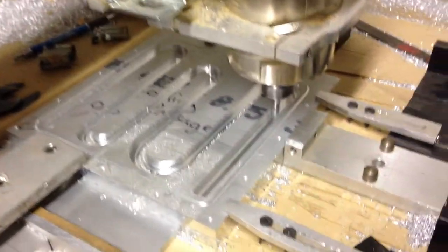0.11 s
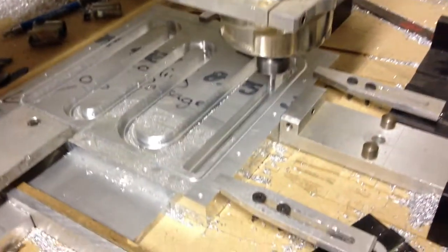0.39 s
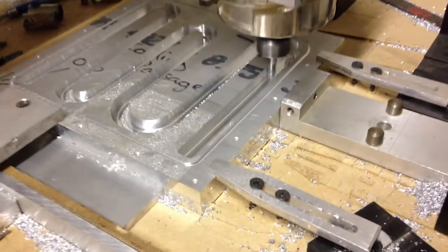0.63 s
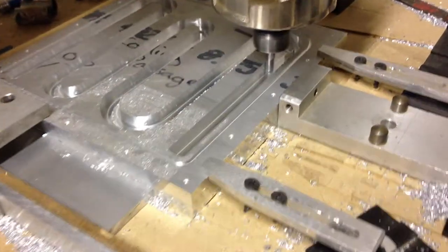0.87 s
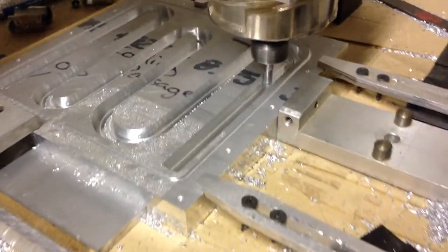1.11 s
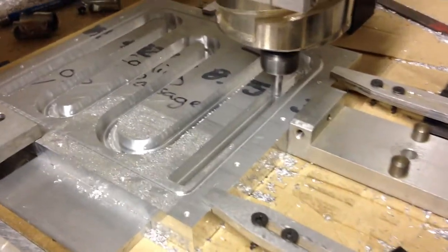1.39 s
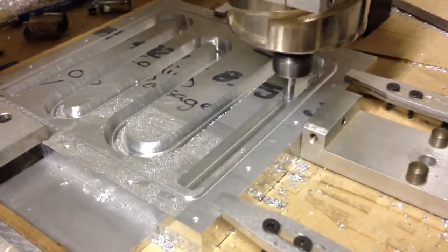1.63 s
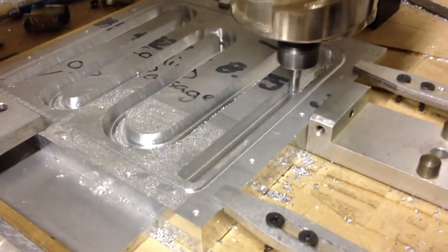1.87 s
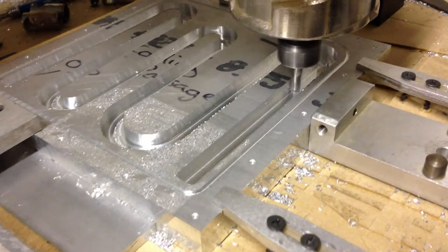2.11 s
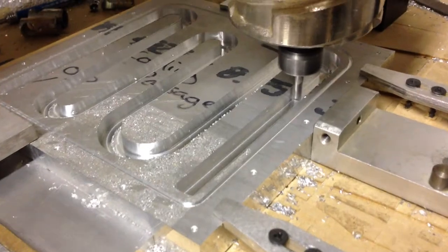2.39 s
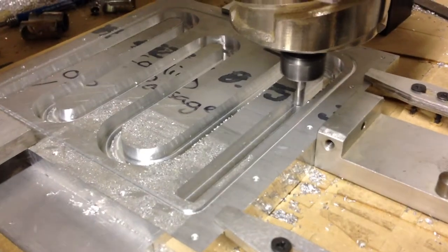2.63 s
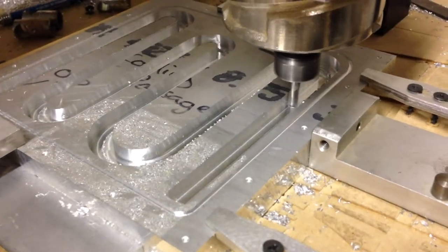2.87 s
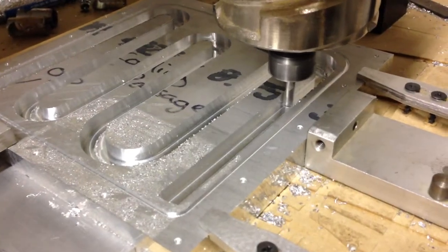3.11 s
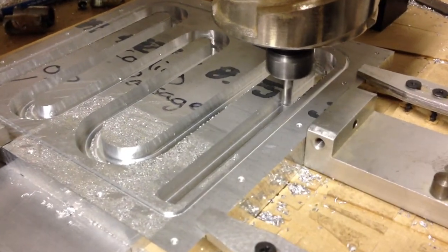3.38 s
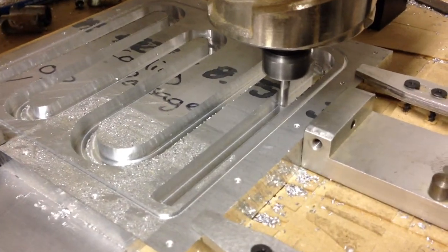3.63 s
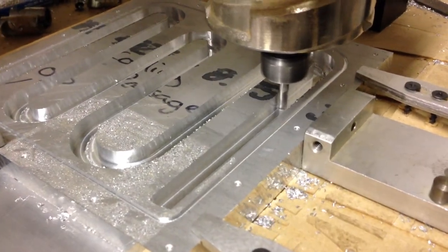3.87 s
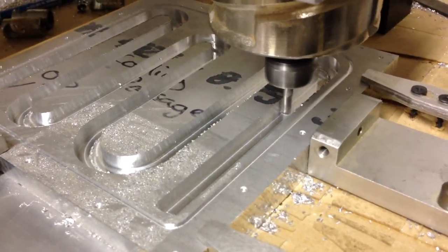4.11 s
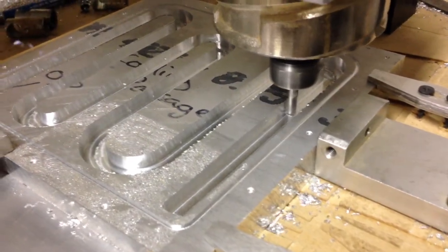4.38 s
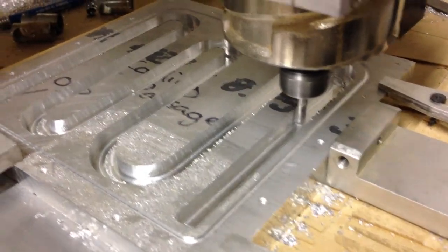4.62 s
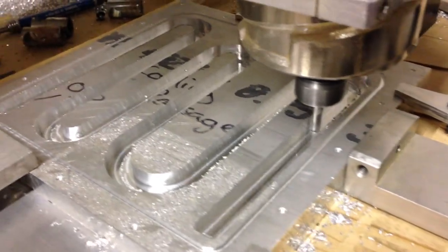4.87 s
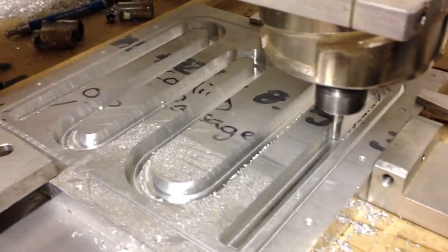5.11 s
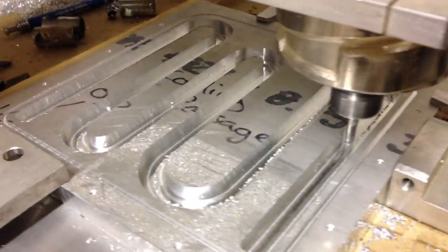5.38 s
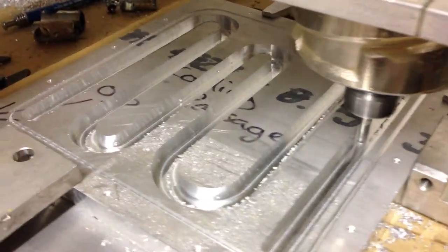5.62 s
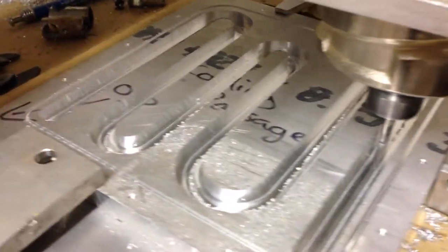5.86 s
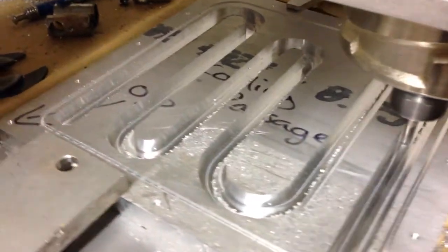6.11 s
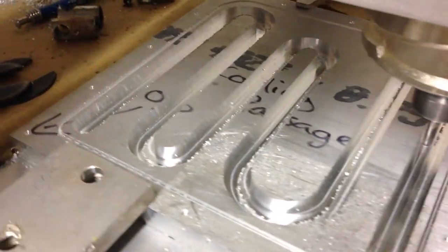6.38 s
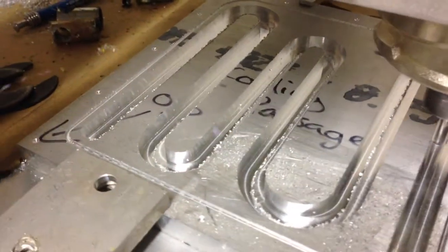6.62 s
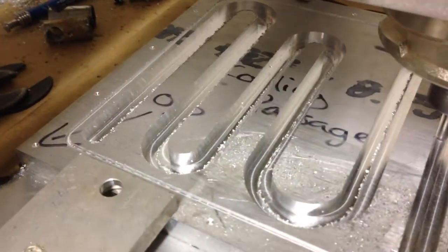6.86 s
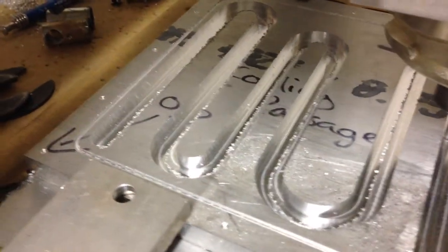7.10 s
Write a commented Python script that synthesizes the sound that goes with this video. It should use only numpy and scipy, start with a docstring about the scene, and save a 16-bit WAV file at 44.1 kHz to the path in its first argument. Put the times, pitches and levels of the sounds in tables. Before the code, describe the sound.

A router spindle screams steadily with a piercing high whine over a broad airy roar, a flute-like tone beneath, heard close in a workshop.

```python
"""A piercing rotor-slot whine over a broad roar is heard first, with a flute-like tone at two cycles a turn. A
router spindle turns at about 23 800 rpm while its end mill runs along a slot in an aluminium plate, near a
phone. Sines locked to the shaft's phase give its orders and the bearing cage's sidebands; shaped noise is air
and chips. The phone comes closer, then swings aside: reflections off plate and table shift most of the bright
bands and swell the weak tones."""
import sys
import numpy as np
from scipy import signal
from scipy.io import wavfile
from scipy.ndimage import uniform_filter1d, map_coordinates

SR = 44100
rng = np.random.default_rng(int(sys.argv[2]) if len(sys.argv) > 2 else 0)


def pcm_store(signal):
    """Save signal as 16-bit PCM."""
    levels = np.round(np.clip(np.atleast_2d(signal), -1, 1) * 32767)
    wavfile.write(sys.argv[1], SR, levels.astype(np.int16).T)


def undo_db(level):
    """Turn decibels back into plain size, where 20 dB means ten times bigger."""
    steps = np.asarray(level, float) / 20
    return 10 ** steps


N = 319284  # samples
SHAFT_HZ = 396.72  # mean shaft speed, turns per second
CAGE = 0.3988  # bearing cage turns per shaft turn


def shaft_turns():
    """Phase as the integral of frequency: the shaft's speed hunts slightly under the cut."""
    speed_hz = SHAFT_HZ + 0.0665 * wobble(6) + 0.0402 * wobble(1)
    return np.cumsum(speed_hz) / SR


# Rotor-slot whine on shaft orders 23 and 22, mean levels: t/s, level of order 23/dB, level of order 22/dB
WHINE = [(0.0, -18, -32), (0.27, -18, -36), (0.4, -21, -39), (0.74, -29.5, -41), (0.9, -26, -36),
         (1.0, -38, -41), (1.27, -25, -46), (1.36, -30, -36), (1.5, -28, -33), (1.83, -25.5, -33),
         (2.04, -20.5, -28), (2.22, -18, -32), (2.78, -17.5, -32), (2.95, -19, -44), (3.55, -19, -40),
         (3.7, -16.5, -42), (4.4, -18.5, -41), (4.82, -21.5, -30), (5.24, -19, -29), (5.79, -25, -28),
         (5.95, -32, -25.5), (6.55, -17, -26.5), (7.24, -18.5, -34)]
# Flute tone (two a turn) and its overtone, which fade while the phone is close, mean levels:
# t/s, level of order 2/dB, level of order 4/dB
FLUTE = [(0, -26.5, -35), (.5, -25, -31), (.72, -34.5, -28), (1.0, -28, -29.5), (1.42, -42, -32),
         (1.61, -29, -29.5), (1.85, -30.5, -32.5), (2.05, -42, -31), (2.3, -36.5, -32.5), (2.5, -38, -30),
         (2.8, -44, -39), (3.55, -46, -33), (3.8, -37.5, -35), (4.4, -36.5, -35.5), (4.75, -46, -36),
         (5.8, -39.5, -30.5), (6.09, -33, -34), (6.3, -34.5, -32), (6.52, -30.5, -40), (6.63, -32, -33),
         (7.2, -27, -35.5)]


def whine_and_flute(turns):
    """Harmonic synthesis: whole multiples of the shaft's phase, under traced and wavering levels."""
    out = np.zeros(N)
    for order, level_db in zip((23, 22, 2, 4), curves(WHINE) + curves(FLUTE)):
        waver_db = 0.64 * wobble(14) + 0.58 * wobble(7)
        out += tone(order * turns, level_db + waver_db)
    return out


# Other strong shaft orders: order, level when close/dB, change when far/dB, change in mid-swing/dB,
# change when aside/dB, random level waver/dB, random phase waver/turns
STRONG = [(1, -32, -2.5, 0.3, -1.5, 0.27, .01), (3, -37, -1.5, -0.5, -1.5, 2.5, .12),
          (12, -34, -1.5, 8, -7, 2.5, 0.11)]


def strong_orders(turns):
    """Position-dependent transmission: each order's level follows the phone, while its phase wavers."""
    far, swing, aside = pose()
    out = np.zeros(N)
    for order, close_db, far_db, swing_db, aside_db, waver_db, slip in STRONG:
        level_db = close_db + far_db * far + swing_db * swing + aside_db * aside
        level_db = level_db + waver_db * wobble(6)
        out += tone(order * turns + slip * wobble(12), level_db)
    return out


# Weaker shaft orders: order, mean level/dB
ORDERS_DB = [(5, -47), (6, -46), (7, -43), (8, -44), (9, -47), (11, -42), (14, -43), (15, -47), (17, -45),
             (19, -43), (20, -46), (21, -51), (24, -47), (25, -52), (27, -52), (29, -55), (32, -59),
             (35, -56), (36, -52)]


def weak_orders(turns):
    """Harmonic series: sines at whole shaft orders, swelled by the reflections."""
    return sum(tone(order * turns, db + swell(order * SHAFT_HZ)) for order, db in ORDERS_DB)


# Bearing tones: shaft order, cage order, mean level/dB
BEARING = [(1, -1, -58), (0, 2, -49), (2, -2, -49), (1, 1, -48), (2, -1, -41), (1, 2, -47), (2, 1, -45),
           (3, -1, -48), (3, 1, -44), (4, 1, -48), (5, -1, -47), (5, 1, -44), (6, 1, -47), (7, -1, -47),
           (6, 2, -50), (7, 1, -42), (8, -1, -46), (8, 1, -49), (9, -1, -47), (11, 1, -39), (13, -1, -43),
           (15, -1, -44)]


def bearing_tones(turns):
    """Combination frequencies: sums and differences of shaft and cage orders form the sidebands."""
    out = np.zeros(N)
    for shaft_order, cage_order, db in BEARING:
        order = shaft_order + cage_order * CAGE
        slip = 0.033 * wobble(4) * abs(cage_order)  # the cage slips a little against the shaft, in turns
        out += tone(order * turns + slip, db + swell(order * SHAFT_HZ))
    return out


def cage_hum(turns):
    """Fundamental of rotation: the bearing cage hums at its own turning rate."""
    far, _, aside = pose()
    level_db = -43.5 + 0.7 * far - 3.5 * aside + 0.74 * wobble(6.6)
    return tone(CAGE * turns, level_db)


# Thin tones off the shaft's series: f/Hz, mean level/dB
THIN = [(119, -72), (278, -57), (2846, -45), (4881, -44), (5458, -39), (5774, -45), (10915, -47),
        (11078, -53), (11549, -47)]


def thin_tones():
    """Narrow-band modulation: faint inharmonic tones of fixed pitch waver in phase and level."""
    t = np.arange(N) / SR
    return sum(tone(hz * t + 0.37 * wobble(4.6), db + swell(hz)) for hz, db in THIN)


# Colour of the roar, before it is levelled: f/Hz, relative spectral level/dB
AIR = [(20, -52), (60, -50), (110, -45), (150, -19), (250, -20.5), (450, -9), (900, -5), (1800, -4),
       (2500, -6), (4500, -3.5), (7500, -5.5), (9500, -8.5), (12000, -16), (15300, -20)]


def roar():
    """Turbulence noise by spectral shaping: fixed colour, moving bright bands and random patches."""
    hz, t, noise = signal.stft(rng.standard_normal(N), SR, nperseg=1024)
    f, db = np.transpose(AIR)
    colour_db = np.interp(np.log(hz + 1), np.log(f), db)[:, None]
    patches_db = 0.8 * smooth_field(noise.shape, 10, 5)
    ripple_db = 1.52 * smooth_field(noise.shape, 2, 110)  # many weak late reflections, drifting slowly
    gain_db = colour_db + lift(hz[:, None], t) + patches_db + ripple_db
    air = signal.istft(noise * undo_db(gain_db), SR, nperseg=1024)[1][:N]
    power = np.abs(uniform_filter1d(air ** 2, size=SR // 2))  # running mean over half a second
    air /= np.sqrt(power + 1e-20)
    _, swing, _ = pose()
    return undo_db(-16.5 + swing + 0.53 * wobble(8)) * air  # 1 dB louder in mid-swing


# Bright and dark bands, most made by reflections; the widest dulls the air near 10 kHz: centre f/Hz, # half-
# width (lift down to e^-2) f/Hz, lift when close/dB, change when far/dB, in mid-swing/dB, when aside/dB, #
# centre's slide when aside f/Hz
BANDS = [(543, 65, 2.5, 5.5, -2.5, -2.2, -15), (1200, 120, 3.5, -5, 2, -3, -14),
         (1300, 310, 2.5, 6, -0.4, -1.2, -100), (2130, 220, -0.9, 5.5, -0.5, 8, 280),
         (2920, 380, 3.5, 0.2, -.6, -1.8, 400), (2610, 260, 0, -4, 2.3, -1.5, 200),
         (3320, 220, -3, 4, -1.5, 5.5, 250), (5090, 200, -1.5, 2.1, 5, -.3, -200),
         (5450, 120, 3.5, -4, -.6, -4.5, 30), (3950, 530, 1.5, -1.5, 2.5, -1, -74),
         (4650, 460, 4, -.6, 1.5, -0.7, -450), (5300, 310, 2, 1, -1.5, 1.3, -30),
         (6120, 650, -0.2, -0.3, 0.5, 3, 150), (6720, 680, 0.6, 0.5, 2.5, 3, 550),
         (5700, 350, -0.2, -1, 0.5, 1, 30), (7960, 500, -0.3, -1.5, 1, 1.5, 30),
         (990, 200, -1.5, 2.5, 1.5, 1.5, 15), (9900, 1200, -2.5, 3.5, 6.5, -4, 30)]


def lift(hz, t):
    """Mostly interference of reflections: dB added at frequencies hz (column) and times t (row), as the phone
    moves."""
    far, swing, aside = pose(t)
    total_db = 0
    for centre, width, close_db, far_db, swing_db, aside_db, slide in BANDS:
        level_db = close_db + far_db * far + swing_db * swing + aside_db * aside
        bell = np.exp(-2 * ((hz - centre - slide * aside) / width) ** 2)
        total_db = total_db + level_db * bell
    return total_db


def swell(hz):
    """Fading by reflection: a weak tone's lift about its mean, and a random drift, deeper for short waves."""
    t = np.linspace(0, N / SR, num=80)
    lift_db = lift(hz, t)
    drift_db = min(1.6, 0.7 + hz / 1000) * wobble(1.5)
    return np.interp(np.arange(N) / SR, t, lift_db - lift_db.mean()) + drift_db


# Where the phone is: t/s, far (0-1), aside (0-1)
PHONE = [(0, 0.95, 0.07), (.3, 1, 0.07), (.6, 0.66, 0), (1.0, 0.54, 0), (1.9, .5, 0.05), (2.8, 0.12, 0),
         (4.2, 0, 0.12), (5, 0.1, .3), (5.7, 0.06, 0.41), (6.2, 0, 0.7), (6.7, 0.1, 0.87), (7.24, 0, 0.97)]


def pose(t=None):
    """Receiver geometry: how far, how much in mid-swing and how far aside the phone is, each 0-1."""
    far, aside = curves(PHONE, t)
    swing = np.sin(np.pi * aside ** 1.35) ** 2
    return far, swing, aside


# Sudden dips of the whole sound: onset t/s, level change before the return is counted/dB,
# return time constant t/s
DIPS = [(.29, -2.5, 0.19), (2.92, -3.5, 0.055), (4.05, -1.5, 0.18), (4.8, -1, 0.11), (6.45, -0.4, 0.25),
        (6.7, -2.2, 0.037)]


def dips():
    """Exponential relaxation: each level dip ramps in over 22 ms and fades back, in dB."""
    t = np.arange(N) / SR
    total_db = np.zeros(N)
    for start, db, back_s in DIPS:
        ramp = np.clip((t - start) / 0.022, 0, 1)
        total_db += db * ramp * np.exp(-np.maximum(t - start, 0) / back_s)
    return total_db


def tone(turns, db):
    """Simple harmonic motion: a sine of rms level db that follows a phase counted in turns."""
    return np.sqrt(2) * undo_db(db) * np.sin(2 * np.pi * (turns + rng.random()))


def wobble(rate):
    """Band-limited random modulation: a smooth curve through normal draws, rate knots a second."""
    knots = rng.standard_normal(200)
    coarse = map_coordinates(knots, [np.arange(0, N + 64, 64) * rate / SR])  # every 64 samples
    return np.interp(np.arange(N), 64 * np.arange(len(coarse)), coarse)


def smooth_field(shape, bins, frames):
    """Correlated randomness: noise averaged over frequency bins and time frames, scaled to rms 1."""
    field = uniform_filter1d(rng.standard_normal(shape), size=bins, axis=0)
    field = uniform_filter1d(field, size=frames, axis=1)
    return field / np.sqrt(np.mean(field ** 2) + 1e-20)


def curves(rows, t=None):
    """Linear interpolation: each column after the time, read at times t (every sample by default)."""
    s, *cols = np.transpose(rows)
    t = np.arange(N) / SR if t is None else t
    return [np.interp(t, s, col) for col in cols]


def scene():
    """Superposition at one microphone, which feeds both channels."""
    turns = shaft_turns()
    spindle = whine_and_flute(turns) + strong_orders(turns) + weak_orders(turns)
    spindle += bearing_tones(turns) + cage_hum(turns)
    mix = undo_db(dips()) * (spindle + thin_tones() + roar())
    return np.tile(mix, (2, 1))


def top_cut(x):
    """Nothing passes above the cut-off."""
    return signal.sosfilt(signal.butter(12, 15300, fs=SR, output="sos"), x)


def record(dry):
    """High-pass response: the microphone drops the deep bass, below about 70 Hz."""
    bass_cut = signal.butter(3, 70, "high", fs=SR, output="sos")
    thin = signal.sosfilt(bass_cut, dry)
    return top_cut(thin)


dry = scene()
out = record(dry)
pcm_store(out)
```